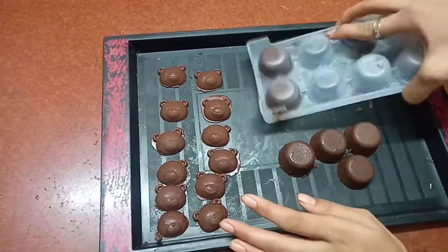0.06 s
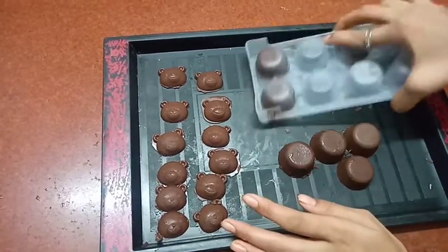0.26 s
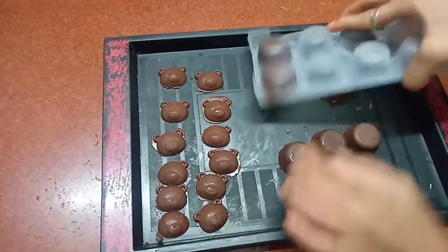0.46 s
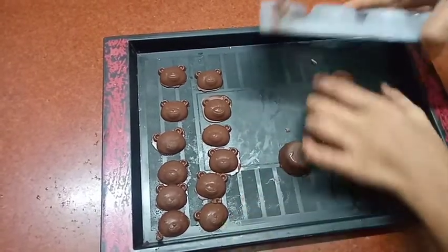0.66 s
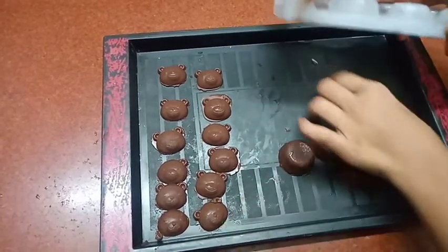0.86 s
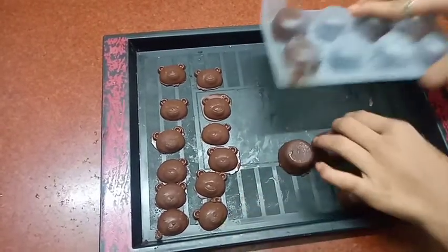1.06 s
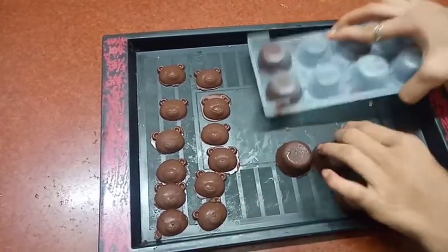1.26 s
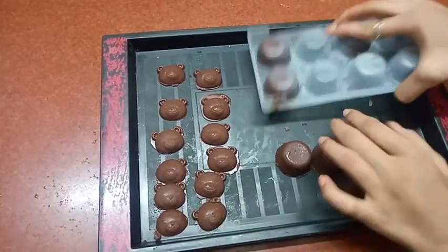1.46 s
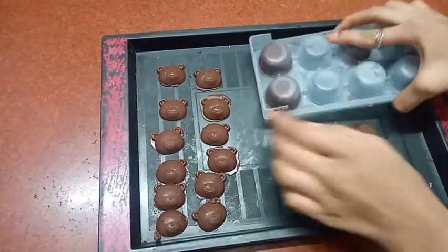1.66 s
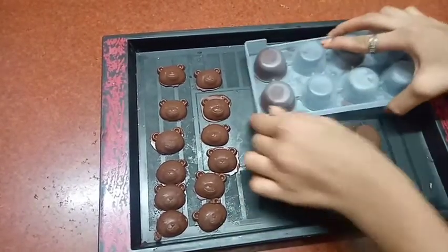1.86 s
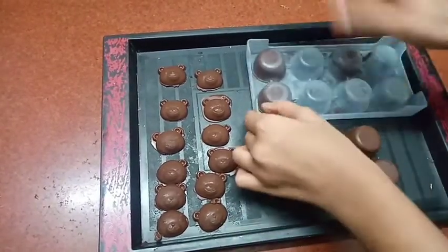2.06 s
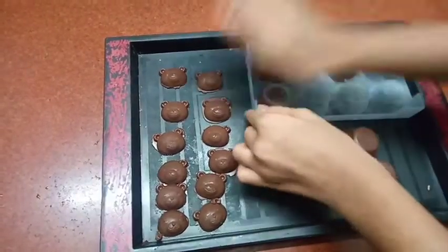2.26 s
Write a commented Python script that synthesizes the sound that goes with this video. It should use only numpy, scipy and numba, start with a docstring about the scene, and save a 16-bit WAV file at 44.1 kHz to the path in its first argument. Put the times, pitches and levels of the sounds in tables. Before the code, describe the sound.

Sharp uneven clacks of a plastic mould against a tray, sweets sliding, then duller palm slaps

```python
"""Mould and sweets on a plastic tray

In a hard-walled kitchen a plastic mould is knocked on a plastic tray, then slapped by hand.
Contacts ring the modes of the tray, and diffuse echoes answer; the counter thuds under some blows.
Sweets slide and bump as bursts of tiny contacts, over steady shaped noise and a wavering appliance hum.
The phone's microphone dulls the treble of the events; its limiter ducks ahead of the loud blows."""
import sys
import numpy as np
from scipy import signal
from scipy.fft import rfft, irfft
from scipy.io import wavfile
from scipy.ndimage import uniform_filter1d, minimum_filter1d
from numba import njit

SR = 44100
rng = np.random.default_rng(int(sys.argv[2]) if len(sys.argv) > 2 else 0)


def transcribe(u):
    """Save the signal u as a 16-bit wav file named by the first command-line argument.

    u: samples, shape (n,) or (channels, n), limited to [-1, 1]; the rate is SR.
    q: integer samples, one column per channel.
    """
    v = np.clip(np.atleast_2d(u).T, -1, 1)
    q = np.round(v * 32767).astype(np.int16)
    wavfile.write(sys.argv[1], SR, q)


def to_linear_factor(level_db):
    """Convert decibel levels (scalar or array-like) to linear amplitude factors."""
    exponent = np.asarray(level_db, float) / 20
    return 10 ** exponent


N = 101429
LEAD = 8820  # samples computed before the start, so an earlier blow can still be heard dying away


def table(rows, hz):
    """Value at hz, in straight lines on a log frequency axis."""
    r = np.array(rows)
    return np.interp(np.log(np.maximum(hz, 1)), np.log(r[:, 0]), r[:, 1])


def colour(x, rows):
    """Causal minimum-phase filter with the gain of (pitch_hz, gain_db) points, by a folded cepstrum."""
    log_gain = table(rows, np.fft.rfftfreq(4096, 1 / SR)) * np.log(10) / 20
    cepstrum = irfft(log_gain)
    cepstrum[1:2048] *= 2
    cepstrum[2049:] = 0
    response = irfft(np.exp(rfft(cepstrum)))
    return signal.fftconvolve(x, response)[:len(x)]


def decay(t, t60):
    """Exponential fade that loses 60 dB in t60 seconds."""
    return np.exp(-np.log(1000) * t / t60)


def walk(rate):
    """Slow random drift, spread near 1, from twice-smoothed random steps at rate per second."""
    k = int(SR / rate)
    steps = np.repeat(rng.standard_normal(64), k)
    return 1.3 * uniform_filter1d(uniform_filter1d(steps, k), k)[:N]


# modes of tray and mould: pitch_hz, level_db (relative, before focus and scatter), t60_s
TRAY_MODES = [(120, -27.5, .04), (270, -33, 0.026), (390, -7.5, 0.045), (644, -11, 0.079), (758, -3, 0.022),
              (966, -14, 0.066), (988, -8, 0.048), (1152, -13, 0.046), (1302, 0, 0.013), (1644, -3, 0.012),
              (1860, -4.5, 0.016), (2207, 1, 0.011), (2400, -1.5, 0.013), (2730, 0.5, 0.0072),
              (3080, -4, 0.0085), (3500, 0.5, 0.0074), (3837, 2, 0.0077), (4300, -1.5, 0.011)]


def ring(hz, focus_db, crack_db):
    """Tray's answer to one contact: decaying modes, focus_db weaker an octave from hz, and a noise crack."""
    mode_scatter_db, crack_s, crack_from_hz = 1, 0.0023, 595
    f, db, t60 = np.array(TRAY_MODES).T
    octaves = np.log2(f / hz)
    db = db + focus_db * octaves ** 2 + mode_scatter_db * rng.standard_normal(len(f))
    t = np.arange(4410)[:, None] / SR
    sign = np.sign(rng.standard_normal(len(f)))  # each mode may start up or down
    modes = (sign * to_linear_factor(db) * decay(t, t60) * np.sin(2 * np.pi * f * t)).sum(axis=1)
    crack = rng.standard_normal(len(t)) * np.exp(-t.ravel() / crack_s)
    crack = signal.lfilter(*signal.butter(2, crack_from_hz, "high", fs=SR), crack)
    return modes + to_linear_factor(crack_db) * np.sqrt(np.sum(to_linear_factor(db) ** 2)) * crack


def knocks(rows, soft_s, rise, first, focus_db, crack_db):
    """A first contact, then chatter at five spots that swells (rise: share of its length) and fades.
    Row 0 is the direct sound; row 1 has the mean spectrum of the spots and feeds the room."""
    chatter_per_s = 1500  # contacts at each spot
    out, t = np.zeros((2, N + LEAD + SR)), np.arange(4410) / SR
    push = (t * np.exp(-t / soft_s))[:200]  # force of one contact, longer where soft
    for start, db, hz, chatter in rows:
        direct, power = 0, 0
        swell = (1 - np.exp(-t / (rise * chatter))) * np.exp(-t / chatter)
        for _ in range(5):
            struck = rng.random(len(t)) < chatter_per_s / SR
            hits = struck * rng.standard_normal(len(t)) * swell
            hits[0] = first
            spot = np.convolve(ring(hz, focus_db, crack_db), push)
            direct = direct + signal.fftconvolve(hits, spot)[:8192]
            power = power + np.abs(rfft(spot, 8192)) ** 2
        # the loudest 4 ms sets the level, as the peak of an equally strong sine
        loudest = uniform_filter1d(direct ** 2, size=176).max()
        direct = to_linear_factor(db) * direct / np.sqrt(2 * loudest)
        # same energy to the room, without the fine detail of one direction
        to_room = irfft(np.sqrt(np.abs(uniform_filter1d(power, size=12))))
        to_room *= np.sqrt(np.sum(direct ** 2) / np.sum(to_room ** 2))
        to_room = np.roll(to_room, int(chatter * SR) + 300)
        i = int(start * SR) + LEAD
        out[:, i:i + len(direct)] += direct, to_room
    return out[:, :N + LEAD]


# mould knocked on the tray, before room and microphone:
# start_s, level_db (peak), pitch_hz (modes strongest near it), chatter_s (fade constant)
MOULD_BLOWS = [(-.12, 8, 1800, 0.0051), (.2018, 11.5, 2200, 0.0029), (.2046, 9, 1620, 0.011),
               (1.1568, 0.5, 2000, 0.0077), (1.1596, 3.5, 2010, 0.014), (1.3514, -3, 2310, 0.017),
               (1.363, -13, 2830, 0.012), (1.385, -9, 1670, 0.0035), (1.538, 1, 2300, 0.0051),
               (1.5408, 8, 1800, .008), (1.6678, -5.5, 3090, 0.0023)]


def mould_blows():
    """Hard plastic on plastic: very short pushes, a full first contact and a bright ring."""
    return knocks(MOULD_BLOWS, soft_s=.00001, rise=.04, first=1.0, focus_db=-2.5, crack_db=-3.5)


# fade of the room: pitch_hz, t60_s
ROOM_FADE = [(100, .5), (400, 0.45), (1000, 0.86), (2000, 0.93), (4000, 0.87), (8000, .5), (14000, 1)]
# strength of the diffuse tail, before build-up and early boost: pitch_hz, level_db
ROOM_STRENGTH = [(100, -14.5), (400, -13), (600, -16), (1000, -12.5), (2000, -13), (4000, -12.5),
                 (8000, -17), (14000, -12)]


def room(x):
    """Diffuse echoes off hard walls build up fast and fade band by band; near surfaces boost the start."""
    build_s, early_db, early_t60_s = 0.0091, 9.5, 0.27
    t, f = np.arange(SR) / SR, np.fft.rfftfreq(SR, 1 / SR)
    early = 1 + to_linear_factor(early_db) * decay(t, early_t60_s)
    noise, tail = rfft(rng.standard_normal(SR)), 0
    for hz in 50 * 2 ** np.arange(0, 9, .5):
        octaves = np.abs(np.log2(np.maximum(f, 1) / hz))
        band = irfft(noise * np.clip(1 - 2 * octaves, 0, 1))
        t60 = table(ROOM_FADE, hz)
        fading = band * decay(t, t60) / np.sqrt(t60 * SR / np.log(1e6))  # long fades gain no energy
        tail = tail + to_linear_factor(table(ROOM_STRENGTH, hz)) * fading
    build = 1 - np.exp(-t / build_s)
    return signal.fftconvolve(x, tail * build * early)[:len(x)]


# spectrum of the steady background: pitch_hz, level_db (relative, per Hz)
BACKGROUND_SPECTRUM = [(20, -34), (55, -26), (100, -5), (170, -7), (400, -5.5), (1000, -12), (2500, -11.5),
                       (4500, -27.5), (5500, -53), (9000, -50), (16000, -65.5)]


def background():
    """Steady kitchen background: noise through a fixed spectrum."""
    level_db = -47  # rms
    noise = colour(rng.standard_normal(N), BACKGROUND_SPECTRUM)
    return to_linear_factor(level_db) * noise / noise.std()


# tones of the appliance: pitch_hz (centre), level_db (rms, before wavering)
HUM_TONES = [(97, -63.5), (160, -57.5), (194, -63.5)]


def appliance_hum():
    """Low steady tones, each drifting on its own in level and slightly in pitch."""
    waver_db, drift_rad_per_s = 4.5, 12
    t, hum = np.arange(N) / SR, 0
    for hz, db in HUM_TONES:
        level = to_linear_factor(db + waver_db * walk(5)) * np.sqrt(2)
        drift = np.cumsum(walk(4.4)) * drift_rad_per_s / SR
        hum = hum + level * np.sin(2 * np.pi * hz * t + drift)
    return hum


# counter under the blows, before the microphone: start_s, level_db (peak before fading), pitch_hz, t60_s
COUNTER_THUDS = [(0.202, 2, 75, 0.047), (.204, -12.5, 251, 0.049), (1.157, -21.5, 68.5, .05),
                 (1.353, -14, 253, 0.03), (1.54, -20, 60, 0.059), (1.93, -25, 390, 0.092)]


def counter_thuds():
    """The struck counter rings briefly at low pitches, each a decaying sine."""
    start, db, hz, t60 = np.array(COUNTER_THUDS).T[:, :, None]
    t = np.maximum((np.arange(N + LEAD) - LEAD) / SR - start, 0)
    return (to_linear_factor(db) * decay(t, t60) * np.sin(2 * np.pi * hz * t)).sum(axis=0)


# sweets bumping tray and each other, before room and microphone:
# start_s, level_db (peak), pitch_hz (modes strongest near it), chatter_s (fade constant)
SWEET_BUMPS = [(.693, -33, 1190, 0.0017), (.722, -37, 1510, .002), (.741, -25, 1470, 0.0046),
               (.745, -25.5, 740, .003), (.763, -20.5, 1580, .005), (.766, -26.5, 740, .003),
               (.7775, -23.5, 2520, 0.0014), (.884, -25.5, 460, .003), (.8845, -34, 2400, 0.0021),
               (.965, -40.5, 890, 0.007), (1.0764, -35, 3200, .0006), (2.222, -39.5, 3500, .002),
               (2.233, -31, 800, .002), (2.265, -39, 3900, 0.0018)]


def sweet_bumps():
    """Small sweets excite few modes: a weak first contact, slowly swelling chatter and a narrow ring."""
    return knocks(SWEET_BUMPS, soft_s=.00002, rise=1.0, first=0.29, focus_db=-15, crack_db=-8.5)


# sweets sliding on the ribbed tray, before room and microphone: start_s, level_db (rms)
SWEET_SLIDE = [(.7, -66.5), (.735, -42), (.79, -35), (.83, -49), (0.869, -34), (.92, -38.5), (0.971, -33.5),
               (1.0, -42), (1.04, -53)]


def sweet_slide():
    """Sweets pushed over the ribs: dense small contacts ring the tray at six spots."""
    contacts_per_s, scatter_db = 400, 1.5  # contacts at each spot; mean boost of a contact
    struck = rng.random(N) < contacts_per_s / SR
    hits = struck * rng.standard_normal(N) * to_linear_factor(scatter_db * rng.exponential(size=N))
    y = 0
    for k in range(6):
        spot = ring(hz=800, focus_db=-1.5, crack_db=-8)
        y = y + signal.fftconvolve(np.roll(hits, 5000 * k), spot)[:N]
    start, db = np.array(SWEET_SLIDE).T
    level = to_linear_factor(np.interp(np.arange(N) / SR, start, db, -120, -120))
    return np.pad(y / y.std() * level, (LEAD, 0))


# palm on the mould, before room and microphone:
# start_s, level_db (peak), pitch_hz (modes strongest near it), chatter_s (fade constant)
PALM_SLAPS = [(1.8785, -24.5, 800, 0.021), (1.928, -9.5, 800, 0.002), (1.9415, -11.5, 1217, 0.0023),
              (1.953, -16.5, 904, .008), (2.0104, -15.5, 1004, 0.0057), (2.0106, -21, 4300, .002),
              (2.043, -33, 1087, 0.0024), (2.065, -35, 1130, 0.005)]


def palm_slaps():
    """A soft palm pushes for longer than plastic does, so the ring is duller."""
    return knocks(PALM_SLAPS, soft_s=.00003, rise=0.087, first=0.83, focus_db=-6.5, crack_db=-4)


# colour of the phone microphone: pitch_hz, gain_db
MICROPHONE_COLOUR = [(30, -34), (100, -11), (300, -2.5), (1000, -1), (3900, -2), (4500, -8.5), (5200, -17),
                     (7000, -21), (9000, -30), (10500, -42), (16000, -40)]


def microphone(x):
    """The microphone thins the bass and dulls the treble; the lead-in is cut off."""
    return colour(x, MICROPHONE_COLOUR)[LEAD:]


# left-right difference, slight and mostly treble: pitch_hz, gain_db (side re mid)
STEREO_SIDE = [(4000, -91), (5000, -23), (8000, -16), (16000, -11)]


def stereo(mono):
    """A noise-smeared, filtered copy is added on the left and subtracted on the right."""
    smear = rng.standard_normal(900) / 30  # about unit energy
    side = colour(np.convolve(mono, smear)[:N], STEREO_SIDE)
    return np.array([mono + side, mono - side])


def scene():
    """Direct sounds, thuds and room reach the microphone, over background and hum."""
    near, around = mould_blows() + sweet_bumps() + sweet_slide() + palm_slaps()
    events = microphone(near + counter_thuds() + room(around))
    return stereo(events + background() + appliance_hum())


@njit
def follow(cut, attack, release):
    """Smooths the gain in dB: fast down, slow up."""
    out, g = np.empty(len(cut)), 0.
    for i in range(len(cut)):
        g += (cut[i] - g) * (attack if cut[i] < g else release)
        out[i] = g
    return out


def limiter(x):
    """Look-ahead limiter led by the left channel: the gain falls before a loud peak, then recovers."""
    limit_db, ahead_s, attack_s, release_s = -1.2, 0.027, 0.009, 0.049
    cut = np.minimum(limit_db - 20 * np.log10(np.abs(x[0]) + 1e-9), 0)
    half = int(ahead_s * SR) // 2
    coming = np.pad(cut, (0, half))[half:]
    deepest = minimum_filter1d(coming, size=2 * half + 1)  # from now to ahead_s later
    return x * to_linear_factor(follow(deepest, 1 / (attack_s * SR), 1 / (release_s * SR)))


def band_limit(x):
    """A steep low-pass at the top of the band."""
    return signal.sosfilt(signal.butter(12, 16100, fs=SR, output="sos"), x)


def record(dry):
    """The phone limits the loud peaks and stores the result."""
    mix = limiter(dry)
    return band_limit(mix)


dry = scene()
out = record(dry)
transcribe(out)
```